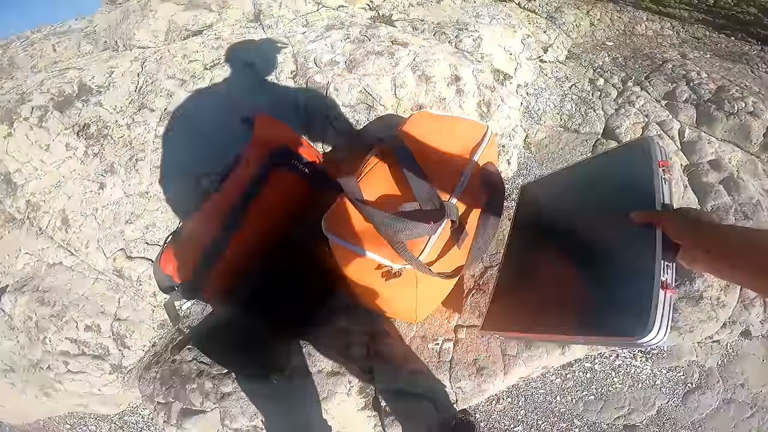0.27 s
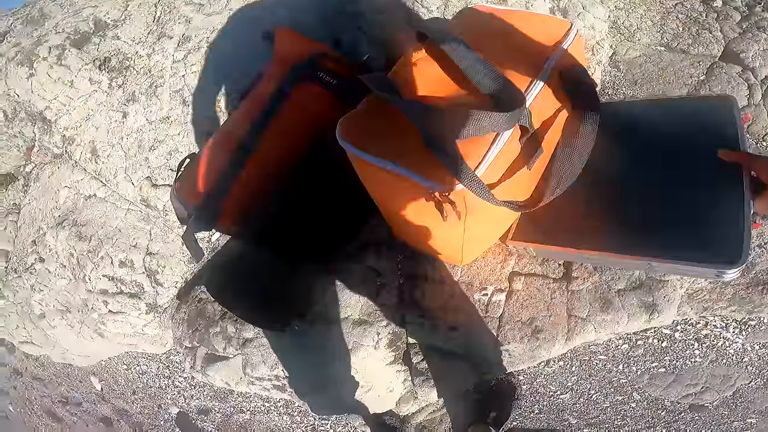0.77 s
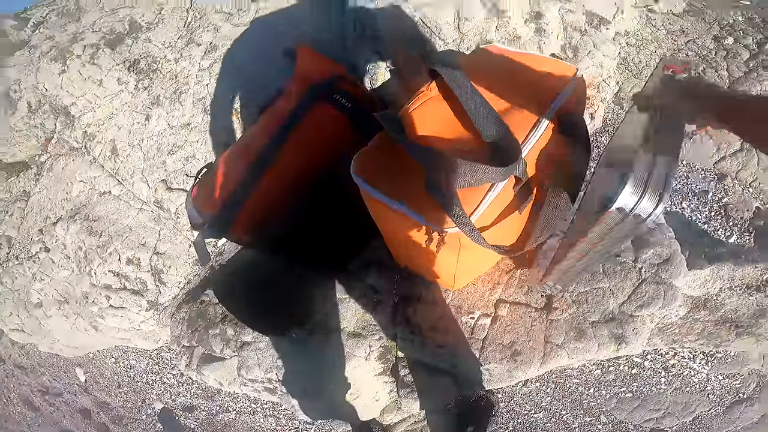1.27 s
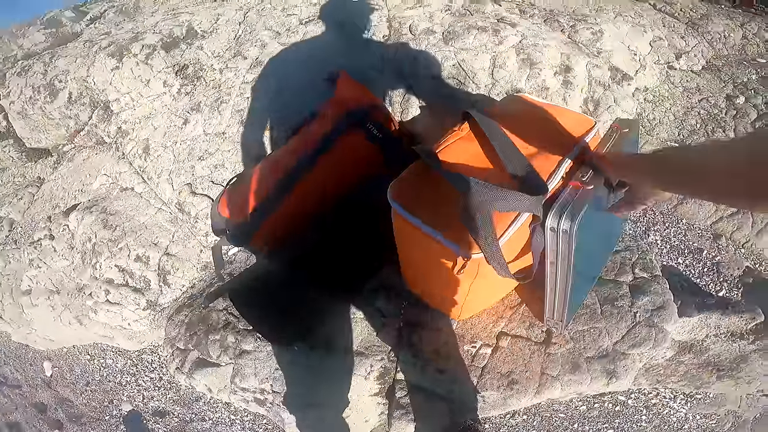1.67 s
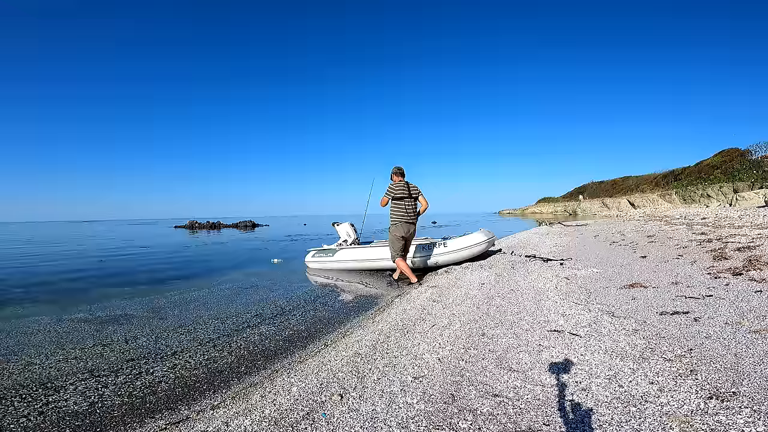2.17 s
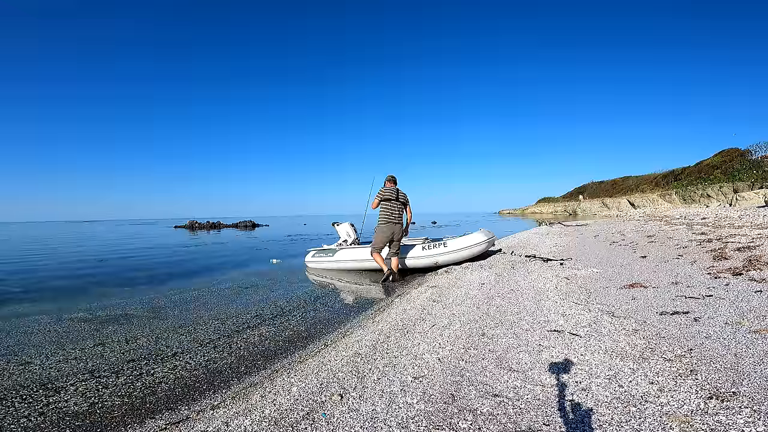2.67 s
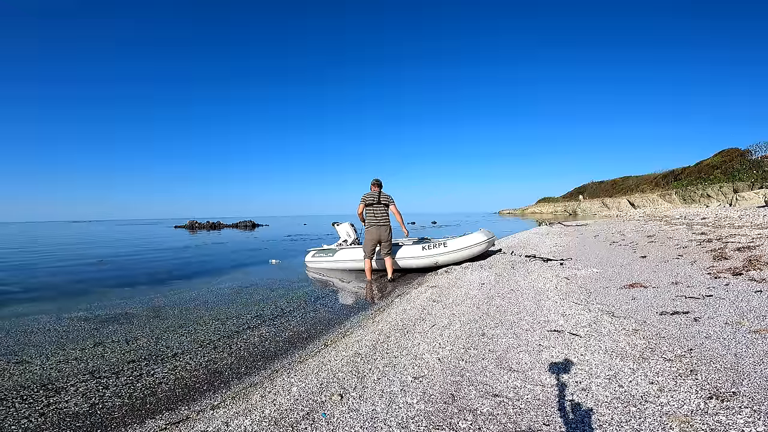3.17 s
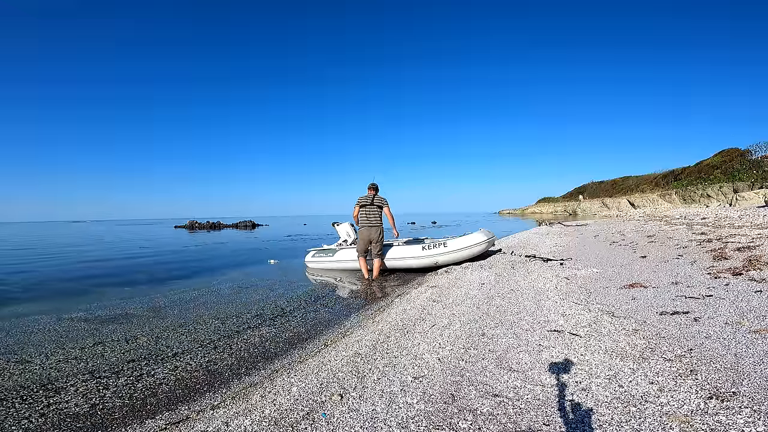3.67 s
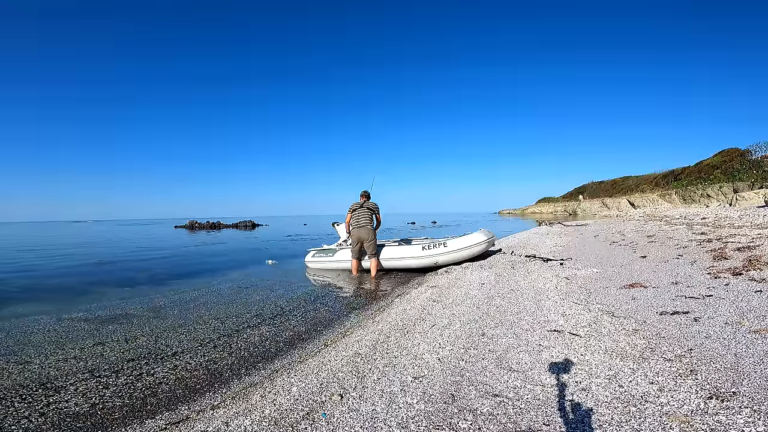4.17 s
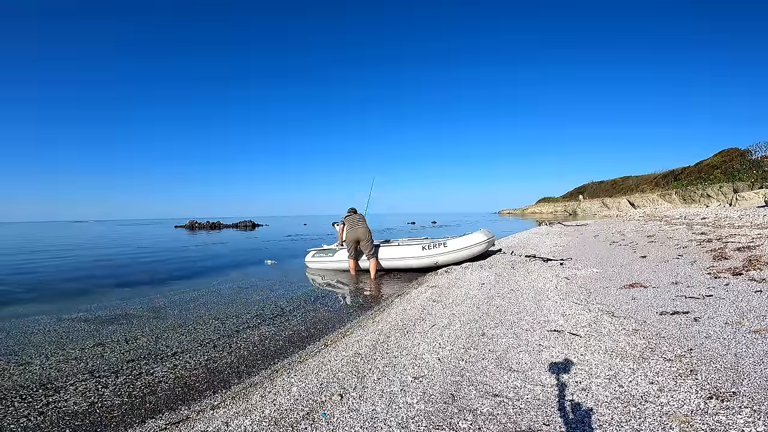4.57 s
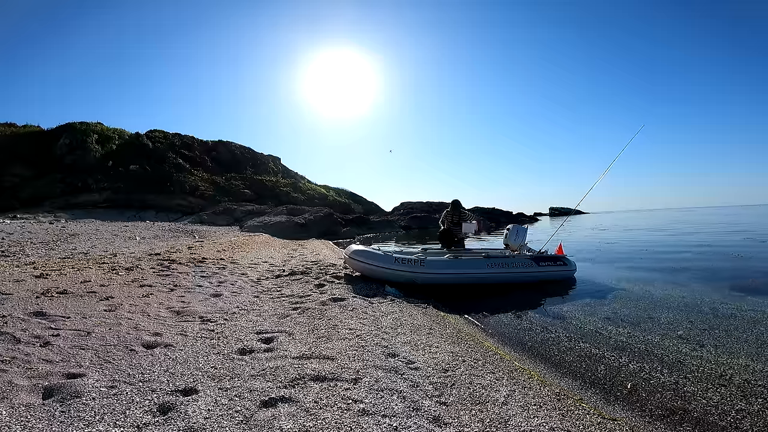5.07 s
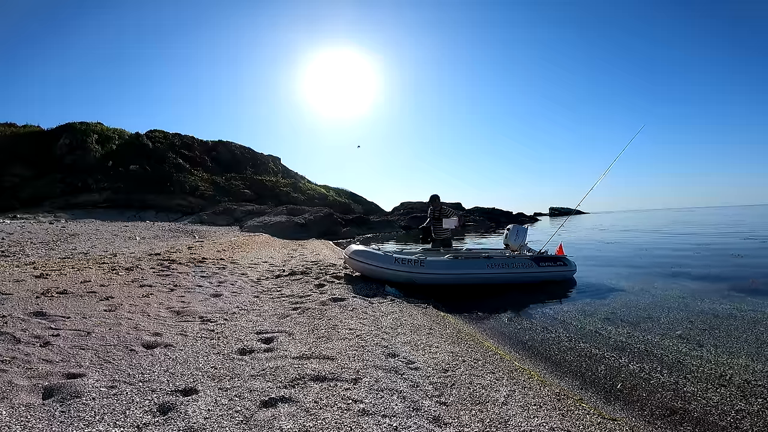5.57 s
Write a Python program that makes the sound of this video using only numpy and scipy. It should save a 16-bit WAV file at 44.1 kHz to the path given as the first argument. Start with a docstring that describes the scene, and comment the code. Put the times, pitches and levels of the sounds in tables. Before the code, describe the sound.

A folded metal table knocks and scrapes on rock beside nylon bags, then wading splashes in shallows, then quiet shore with a brief reel ratchet.

```python
"""Calm pebble beach: a folded table is knocked and dragged over rock and leant against nylon bags.
Frame and panel modes ring at each knock. Wading follows: shaped noise and crowds of rising bubble tones
make slosh, spray and fizz; swept tones make the gulps round the legs, noise ticks the wavelets on shingle.
Last, a fishing reel ratchets briefly as rows of pawl rings, with two faint knocks.
Low open-air rumble and a farther wash, both coloured noise, run throughout."""
import sys
import numpy as np
from scipy import signal
from scipy.fft import rfft, irfft, next_fast_len
from scipy.io import wavfile

SR = 44100
rng = np.random.default_rng(int(sys.argv[2]) if len(sys.argv) > 2 else 0)


def waveform_to_disk(signal):
    """Save audio, clipped to [-1, 1], as 16-bit WAV at the path in sys.argv[1]."""
    frames = np.transpose(np.atleast_2d(signal))
    scaled = np.clip(frames, -1, 1) * 32767
    samples = np.round(scaled).astype(np.int16)
    wavfile.write(sys.argv[1], SR, samples)


N = 257103
T = np.arange(N) / SR  # seconds

# Levels in the tables are relative, ahead of any trim in the function that reads them.
# Open-air rumble spectrum. Each row: frequency in Hz, level in dB.
RUMBLE_SPECTRUM = [(25, -38), (50, 2.5), (85, 1), (170, 1.5), (240, -1.5), (400, -14.5), (800, -21)]
# Farther water spectrum. Each row: frequency in Hz, level in dB.
FAR_WATER_SPECTRUM = [(200, -2), (450, -0.5), (800, -5), (1200, -4), (1600, -8), (2500, -8.5), (4000, -19),
                      (7000, -28.5), (8500, -41.5), (11000, -37), (14000, -52)]
# Farther waves lapping. Each row: peak in seconds, level in dB, rise in seconds, fall in seconds.
FAR_LAPS = [(4.42, -44.5, 0.23, 0.18), (5.16, -54.5, 0.31, 0.22), (5.8, -55.5, 0.93, 0.35)]
# Reel ratchet. One row: start in seconds, number of clicks, clicks a second.
REEL_TURN = (5.0635, 8, 75.5)
# Pawl modes. Each row: frequency in Hz, level in dB, t60 in seconds.
PAWL_MODES = [(1970, -6, 0.019), (2740, 0, 0.018), (3340, -8.5, 0.021), (3830, -9, 0.011),
              (4570, -15, 0.011), (5200, -23, .006)]
# Noise of the pawl's snap. Each row: frequency in Hz, level in dB.
SNAP_SPECTRUM = [(1500, -12.5), (3000, 14), (5500, -18)]
# Strides and shoves in the shallows. Each row: peak in seconds, spray in dB, slosh in dB,
# rise in seconds, settle in seconds.
STRIDES = [(2.52, -43.5, -52.5, 0.21, 0.27), (3.11, -41.5, -45.5, 0.092, 0.16),
           (3.47, -48.5, -56, 0.078, 0.14), (3.732, -34, -35, 0.12, 0.18), (3.98, -39, -47.5, 0.065, 0.075),
           (4.168, -38, -39.5, 0.17, 0.58), (4.45, -40, -67, .2, 0.13)]
# Wavelets running up the shingle. Each row: peak in seconds, level in dB, rise in seconds, fall in seconds.
WAVELETS = [(2.44, -44, 0.067, 0.045), (2.69, -42.5, 0.066, 0.09), (2.88, -41, 0.06, 0.1),
            (2.97, -39, 0.065, 0.096), (3.21, -42.5, 0.032, 0.043)]
# Water spectra: spray, slosh, fizz, wavelets on shingle. Each row: frequency in Hz, level in dB.
SPRAY_SPECTRUM = [(600, -34), (1200, -19), (1900, -1), (3000, 1), (4200, -5.5), (5500, -8), (8000, -53)]
SLOSH_SPECTRUM = [(200, 2), (300, -11), (600, -1.5), (1100, 5.5), (1600, 4), (2600, -25)]
FIZZ_SPECTRUM = [(2500, -2), (4500, -1), (5500, -1), (7200, -3), (8300, -21.5), (10500, -12), (12500, -31),
                 (14500, -49)]
SHINGLE_SPECTRUM = [(900, -17), (1600, -9), (2600, 1.5), (4000, 1), (5500, -4.5), (7200, -7), (8500, -21),
                    (11000, -20.5), (14000, -44)]
# Loudest bubbles. Each row: start in seconds, level in dB, starting pitch in Hz.
BUBBLES = [(2.482, -28, 4000), (2.571, -22.5, 1272), (2.663, -31, 5160), (2.668, -32.5, 1510),
           (2.825, -33, 1410), (2.858, -27.5, 2740), (2.997, -16.5, 3550), (3.057, -21, 2570),
           (3.129, -29, 1150), (3.135, -21.5, 3770), (3.157, -24, 2560), (3.193, -24.5, 3220),
           (3.252, -26.5, 3600), (3.284, -27.5, 2080), (3.344, -32.5, 3580), (3.36, -31.5, 1115),
           (3.484, -27.5, 3740), (3.599, -28.5, 960), (3.667, -25, 1340), (3.69, -19.5, 1680),
           (3.724, -14, 2780), (3.724, -15.5, 5120), (3.742, -16, 1810), (3.82, -23, 3800),
           (3.845, -25, 2640), (3.862, -29.5, 372), (3.98, -23, 2740), (4.105, -16.5, 1135),
           (4.165, -19, 2090), (4.289, -20.5, 1530), (4.32, -15.5, 1900), (4.393, -21.5, 2160),
           (4.478, -30.5, 292), (4.495, -25, 1460), (4.58, -27, 1880), (4.67, -30, 3290),
           (4.719, -41, 2930)]
# Slaps of water. Each row: start in seconds, level in dB, centre in Hz, t60 in seconds.
SLAPS = [(2.463, -28, 3500, 0.047), (2.993, -29, 2550, 0.15), (3.065, -27, 5400, 0.053),
         (3.42, -46, 7000, 0.011), (3.664, -20.5, 1480, 0.031), (3.721, -15, 3100, 0.019),
         (3.747, -22, 3120, 0.16), (4.158, -27, 800, .04), (4.276, -41, 370, 0.33),
         (4.279, -25.5, 2850, 0.088), (4.321, -17.5, 1960, 0.03), (4.362, -35, 342, 0.18),
         (4.472, -24, 1170, 0.038), (4.476, -42, 410, 0.082), (4.648, -32.5, 1450, 0.025)]
# Air pockets closing behind the legs. Each row: start in seconds, length in seconds,
# starting pitch in Hz, level in dB.
GULPS = [(2.585, 0.031, 1320, -46.5), (3.124, 0.036, 560, -44.5), (3.274, 0.077, 293, -54.5),
         (3.331, 0.057, 477, -48), (3.496, .027, 544, -51), (3.628, 0.027, 572, -44),
         (3.684, 0.042, 783, -32), (4.158, .028, 509, -32), (4.166, 0.053, 800, -33)]
# Strokes of nylon along the table. Each row: peak in seconds, level in dB, rise in seconds, fall in seconds.
STROKES = [(0.025, -41.5, 0.062, 0.11), (0.28, -47, 0.13, 0.15), (0.58, -47, 0.16, 0.16),
           (0.85, -35, 0.057, 0.037), (0.98, -49.5, .03, 0.087), (1.33, -49, 0.056, 0.15),
           (1.68, -42.5, 0.18, 0.11), (1.96, -50, 0.3, 0.24)]
# Table edge dragging on rock. Each row: time in seconds, level in dB.
DRAG_LEVEL = [(0.0, -46), (0.4, -49.5), (1.09, -42), (1.2, -50.5), (1.32, -52), (1.53, -51.5),
              (1.68, -43.5), (1.86, -47), (2.18, -55)]
# Nylon spectrum. Each row: frequency in Hz, level in dB.
NYLON_SPECTRUM = [(400, -7), (700, 6.5), (1300, -1.5), (2200, -2.5), (3600, -4), (5600, -5), (7300, -14.5),
                  (8500, -19.5), (11000, -18), (14000, -39.5)]
# Spectra of reedy cloth rub, panel boom and drag scuff. Each row: frequency in Hz, level in dB.
RUB_SPECTRUM = [(2300, -9.5), (2830, -1), (3250, -9), (3740, 0.0), (4600, -16)]
BOOM_SPECTRUM = [(80, -29), (200, -10.5), (300, 1.5), (600, -3.0)]
SCUFF_SPECTRUM = [(120, -21), (300, -9.5), (500, 8.0), (900, -3.5), (1800, -6.0)]
# Knocks of table and gear. Each row: start in seconds, clack in dB, panel thud in dB,
# treble tilt in dB an octave, clatter t60 in seconds, pitch of the struck spot in Hz.
KNOCKS = [(0.025, -23, -28, -6, 0.041, 3740), (0.128, -34, -28, -2.5, 0.028, 715),
          (0.239, -31, -31.5, -17, 0.041, 850), (0.437, -30, -42, -5.5, 0.011, 730),
          (0.483, -18.5, -28, -7, 0.014, 1680), (0.508, -13, -31.5, -1, 0.0089, 3180),
          (0.647, -14.5, -11, -1, 0.045, 1830), (0.872, -16, -29, -6, 0.014, 1300),
          (0.8895, -10, -13.5, -4.5, 0.023, 1790), (0.893, -23, -3, -7, 0.017, 593),
          (0.988, -19.5, -11.5, -4.5, 0.031, 880), (1.06, -36, -28, -1, 0.073, 2080),
          (1.102, -38, -22.5, -1.5, 0.25, 950), (1.126, -27.5, -16.5, -2, 0.12, 2040),
          (1.157, -22, -17.5, -3.5, 0.092, 760), (1.176, -19.5, -12.5, -3, 0.078, 905),
          (1.185, -21.5, -7, -4, 0.053, 1480), (1.254, -42, -66, 12, .0084, 5130),
          (1.318, -32, -56, 0, 0.029, 3580), (1.509, -4.5, -5, -2.5, 0.026, 3640),
          (1.605, -16.5, -18.5, -3.5, 0.076, 2240), (1.649, -11.5, -15, -2, 0.05, 1690),
          (1.676, -14, -33, -3.5, 0.018, 850), (1.698, -24.5, -36, -5, 0.074, 1240),
          (1.722, -13.5, -17.5, -1.5, 0.042, 2680), (1.751, -22, -27, -1, 0.022, 2940),
          (1.8093, -16.5, -44, -4.5, 0.0098, 2200), (1.85, -34, -46, -21, .029, 1210),
          (1.905, -25.5, -22, -1.5, 0.097, 1830), (1.978, -26.5, -34, -1.5, 0.037, 4520),
          (2.146, -26.5, -31, -1, 0.0055, 2060), (5.177, -35.5, -50, -6, 0.035, 1490),
          (5.421, -39, -65.5, -5, 0.012, 2320)]
# Hollow panel modes. Each row: frequency in Hz, level in dB, t60 in seconds.
PANEL_MODES = [(86.7, -31, 0.33), (135.8, -21.5, 0.33), (178, -39, 0.055), (200, -12.5, .12),
               (236.4, -16, 0.22), (267.1, 0, 0.12), (320, 6.5, 0.063), (364.4, 7, 0.049),
               (391.6, 6, 0.078), (428, -8.5, 0.13), (471, -6, 0.074), (540, -16.5, 0.034)]
# Aluminium frame resonances. Each row: frequency in Hz, width in Hz, level in dB.
FRAME_MODES = [(651, 55, 1), (790, 62, 1), (970, 23, -6), (1161, 35, -1), (1660, 27, -8), (1870, 56, 0),
               (2090, 63, 0.5), (2400, 21, -9.5), (2583, 19, 3.5), (3030, 39, -31), (3550, 66, -13),
               (4260, 77, -14), (4950, 190, -4.5), (5540, 200, -5.5), (6380, 390, -20.5), (7030, 450, -5)]
# Clack spectrum under the frame resonances. Each row: frequency in Hz, level in dB.
CLACK_SPECTRUM = [(150, -26), (450, 4), (900, 6.5), (2000, 5.5), (4000, 4.5), (6500, -2), (8000, -9),
                  (11000, -9), (14000, -47)]
# Rattle of panel on panel. Each row: frequency in Hz, level in dB.
RATTLE_SPECTRUM = [(70, -29), (130, -16), (220, -4), (400, -9), (560, -9.5), (1200, -12.5)]

EDGE_HZ = 14300
HANDLING_END_S, WADING_END_S = 2.18, 4.73
FAR_FLOOR_DB = -58
STRIDE_SHAPE, SWELL_SHAPE = 1.03, 1.84  # exponent of the fall in dB: 1 steady, 2 rounded
BUBBLE_T60_S, BUBBLE_SIZE_LAW = 0.041, 1  # t60 at 1 kHz; lower bubbles ring longer
GULP_OCTAVES_PER_S = 15.74


def amp(db):
    """Decibels to gain."""
    return 10 ** (np.asarray(db) / 20)


def unit(x):
    """Scales to an rms of one."""
    return x / np.sqrt(np.mean(x ** 2) + 1e-20)


def add(mix, start_s, sound):
    """Adds a sound to the mix at start_s."""
    part = mix[max(round(start_s * SR), 0):][:len(sound)]
    part += sound[:len(part)]


def read(points, hz):
    """Spectrum in dB at any frequency, falling 20 dB an octave beyond its ends."""
    point_hz, db = np.transpose(points)
    octave, known = np.log2(hz + 1), np.log2(point_hz + 1)
    beyond = abs(octave - np.clip(octave, known[0], known[-1]))
    return np.interp(octave, known, db) - 20 * beyond


def colour(x, points):
    """Filters a sound by a spectrum, at unit rms."""
    size = next_fast_len(len(x))
    gain = amp(read(points, np.fft.rfftfreq(size, 1 / SR)))
    return unit(irfft(rfft(x, size) * gain, size)[:len(x)])


def flutter(rate_hz, depth_db):
    """Gain that wanders at random."""
    knots = rng.standard_normal(N // 20)
    return amp(depth_db * np.interp(T * rate_hz, np.arange(len(knots)), knots))


def clicks(per_s, spread_db):
    """Random impulses, mostly small, a few large."""
    size = amp(spread_db * np.minimum(rng.exponential(1, N), 4)) * rng.choice([-1, 1], N)
    return size * (rng.random(N) < per_s / SR)


def swells(rows, shape):
    """Gain of overlapping swells: round rise, shaped fall, 10 dB down one rise or fall time off peak."""
    power = 0
    for peak_s, db, rise_s, fall_s in rows:
        before = np.maximum((peak_s - T) / rise_s, 0) ** 2
        after = np.maximum((T - peak_s) / fall_s, 0) ** shape
        power = power + amp(db - 10 * (before + after)) ** 2
    return np.sqrt(power)


def until(end_s):
    """Gate open until end_s, then shut over 10 ms."""
    return np.clip((end_s - T) * 100 + 1, 0, 1)


def crackle(per_s, points):
    """Tiny stones and drops tick: noise bursts, each dying within a few milliseconds."""
    t = np.arange(SR // 200) / SR
    ticks = np.zeros(N)
    for _ in range(8):  # eight tick shapes
        tick = rng.standard_normal(len(t)) * np.exp(-t / .0007)
        ticks += signal.oaconvolve(clicks(per_s / 8, 3), tick)[:N]
    return colour(ticks, points)


def ping(hz, t60_s, rise):
    """Bubble rings, pitch rising by the fraction rise over t60 as it nears the surface."""
    t = np.arange(int(t60_s * SR) + 8) / SR
    tone = np.sin(2 * np.pi * hz * (t + rise * t * t / (2 * t60_s)))
    return tone * 1000 ** (-t / t60_s) * (1 - np.exp(-t * hz * 2))


def froth(low_hz, high_hz, per_s, cycles, spread_db, rise, count=36):
    """Crowd of bubbles of many sizes, each size ringing for a number of its own cycles."""
    out = np.zeros(N)
    for hz in np.geomspace(low_hz, high_hz, count) * rng.uniform(.97, 1.03, count):
        bubble = ping(hz, cycles * rng.uniform(1.0, 2.6) / hz, rise)
        out += signal.oaconvolve(clicks(per_s / count, spread_db), bubble)[:N] * np.sqrt(hz)
    return unit(out)


def shore(rumble_db=-55):
    """Open air rumbles softly under the wash of farther wavelets."""
    air = colour(rng.standard_normal(N), RUMBLE_SPECTRUM) * flutter(26, 0.5)
    ticks = unit(clicks(400, 5.8))
    bubbles = froth(510, 3890, 240, 25, 6.4, 0.35, count=16)
    wash = colour(rng.standard_normal(N) + 0.28 * ticks + .15 * bubbles, FAR_WATER_SPECTRUM)
    return amp(rumble_db) * air + wash * np.hypot(amp(FAR_FLOOR_DB), swells(FAR_LAPS, SWELL_SHAPE))


def reel(click_db=-40, snap_t60_s=0.0049):
    """Pawl snaps over its teeth and rings, hardest in mid turn, dulled by distance."""
    start_s, teeth, per_s = REEL_TURN
    out, t = np.zeros(N), np.arange(SR // 20) / SR
    for k in range(round(teeth)):
        ring = np.zeros(len(t))
        for hz, db, t60_s in PAWL_MODES:
            ring += amp(db - 60 * t / t60_s) * np.sin(2 * np.pi * (hz * t + rng.random()))
        snap = amp(-60 * t / snap_t60_s) * colour(rng.standard_normal(len(t)), SNAP_SPECTRUM)
        force = np.sqrt(np.sin(np.pi * (k + .5) / teeth))
        add(out, start_s + k / per_s, amp(click_db) * force * (ring + snap))
    return signal.sosfilt(signal.butter(6, 5300, fs=SR, output="sos"), out)


def gulps(width_hz=130, churn=.55):
    """Shrinking air pocket rings upward, roughened by the churning water."""
    out = np.zeros(N)
    for start_s, length_s, start_hz, db in GULPS:
        size, pole = int(length_s * SR), np.exp(-np.pi * width_hz / SR)
        a, b = rng.standard_normal((2, size))
        wobble = signal.lfilter([1], [1, -2 * pole, pole * pole], a + 1j * b)  # slow, smooth churning
        pitch_hz = start_hz * 2 ** (GULP_OCTAVES_PER_S * T[:size])
        turn = np.exp(2j * np.pi * np.cumsum(pitch_hz) / SR)
        rough = (turn * (1 + churn * wobble / wobble.std())).real
        add(out, start_s, amp(db) * unit(rough * signal.windows.tukey(size, .5)))
    return out


def plops(slap_db=-2, rise=0.033):
    """Slaps of water burst briefly as noise; the loudest bubbles ring on their own."""
    out, t = np.zeros(N), np.arange(SR // 5) / SR
    for start_s, db, hz in BUBBLES:
        t60_s = BUBBLE_T60_S * (1000 / hz) ** BUBBLE_SIZE_LAW
        add(out, start_s, amp(db) * ping(hz, t60_s, rise))
    for start_s, db, hz, t60_s in SLAPS:
        band = [(hz / 3, -20), (hz * 0.69, -3), (hz, 0), (hz * 1.64, -6), (hz * 2.3, -24)]
        burst = colour(rng.standard_normal(len(t)), band) * (1 - np.exp(-t / 0.00007))
        add(out, start_s, amp(db + slap_db - 60 * t / t60_s) * burst)
    return signal.sosfilt(signal.butter(2, 7800, fs=SR, output="sos"), out)


def shallows(fizz_db=-14, plink_db=-2, drop_db=-3):
    """Strides stir water: large bubbles slosh, small ones spray and plink; wavelets tick through shingle."""
    spray = swells([(s, db, rise, settle) for s, db, _, rise, settle in STRIDES], STRIDE_SHAPE)
    slosh = swells([(s, db, rise, settle) for s, _, db, rise, settle in STRIDES], STRIDE_SHAPE)
    hiss = amp(-6) * rng.standard_normal((4, N))
    small = colour(froth(1200, 6500, 1500, 30, 3.5, .22) + .7 * hiss[0], SPRAY_SPECTRUM)
    small += amp(drop_db) * crackle(160, SPRAY_SPECTRUM)
    plinks = amp(plink_db) * froth(1280, 4570, 120, 48, 4.3, 0.13, count=28)
    large = colour(froth(280, 1900, 300, 26, 2.5, .4), SLOSH_SPECTRUM)
    large += amp(-8) * colour(hiss[1], SLOSH_SPECTRUM)
    foam = colour(hiss[2] + 1.1 * unit(clicks(2000, 3.8)), FIZZ_SPECTRUM)
    wash = colour(hiss[3] + froth(1500, 6000, 700, 32, 3, .1, count=20), SHINGLE_SPECTRUM)
    wash = unit(wash + .7 * crackle(240, SHINGLE_SPECTRUM))
    surge = flutter(70, 1.8)
    stirred = (unit(small * surge + plinks) + amp(fizz_db) * unit(foam * surge)) * spray
    stirred += unit(large) * slosh
    # reversed surge keeps the wavelets out of step with the spray
    lapping = unit(wash * surge[::-1]) * swells(WAVELETS, SWELL_SHAPE)
    return (stirred + lapping) * until(WADING_END_S)


def panel_ring(vary_db=2, swell_s=0.0036, low_hz=70):
    """Panels' low ring: each blow stirs the modes a little differently; deep bass does not radiate."""
    t = np.arange(SR // 2) / SR
    ring = np.zeros(len(t))
    for hz, db, t60_s in PANEL_MODES:
        level, detune = rng.standard_normal(2)
        tone = np.sin(2 * np.pi * hz * (1 + 0.0091 * detune) * t + 0.37 * detune)
        ring += amp(db + vary_db * level - 60 * t / t60_s) * tone
    ring *= 1 - np.exp(-t / swell_s)
    ring = signal.sosfilt(signal.butter(3, low_hz, "high", fs=SR, output="sos"), ring)
    return ring / abs(ring).max()


def clack(tilt_db, t60_s, spot_hz, lead_s, ring_db=4, spot_db=6, spot_q=6,
          tail_db=-31, tail_t60_s=0.38, scrape_db=-11, scrape_s=0.0035):
    """Metal scrapes into contact, chatters on stone and rings the frame; rocks scatter a faint tail."""
    size = 16384
    t, hz = np.arange(size) / SR - lead_s, np.fft.rfftfreq(size, 1 / SR)
    scrape = amp(scrape_db) * np.exp(-abs(t) / scrape_s)
    chatter = amp(-60 * abs(t) / t60_s) + amp(tail_db - 60 * abs(t) / tail_t60_s)
    force = np.where(t < 0, scrape, chatter)
    frame = sum(amp(db + ring_db) / (1 + 2j * (hz - f) / width) for f, width, db in FRAME_MODES)
    frame = frame / (1 + (hz / 8000) ** 8)
    # broad resonance of the struck spot
    spot = 1 + amp(spot_db) / (1 + 2j * spot_q * (hz / spot_hz - 1))
    tilt = amp(tilt_db * np.log2(np.clip(hz, 700, 9000) / 2000))
    body = (amp(read(CLACK_SPECTRUM, hz)) + frame) * spot * tilt
    body /= np.sqrt(np.mean(abs(body) ** 2))
    return irfft(rfft(force * rng.standard_normal(size)) * body)[:size * 3 // 4]


def handling(scuff_db=-2, rub_db=-7, tap_db=-9, taps_per_s=45):
    """Nylon and grit slide along the table, rustle, tap the frame lightly and keep its panels astir."""
    # grit ticks in the hiss of the weave; taut cloth has two reedy resonances
    fibres = colour(rng.standard_normal(N), NYLON_SPECTRUM) + .7 * crackle(260, NYLON_SPECTRUM)
    rub = colour(rng.standard_normal(N), RUB_SPECTRUM)
    cloth = unit((fibres + amp(rub_db) * rub) * flutter(90, 1.5))
    boom = colour(signal.oaconvolve(clicks(830, 2.2), panel_ring())[:N], BOOM_SPECTRUM)
    scuff = colour(rng.standard_normal(N) * flutter(50.04, 5.5), SCUFF_SPECTRUM)
    taps = unit(signal.oaconvolve(clicks(taps_per_s, 1.3), clack(-3.5, 0.012, 3000, 0))[:N])
    drag = boom + amp(scuff_db) * scuff + amp(tap_db) * taps
    drag *= amp(np.interp(T, *np.transpose(DRAG_LEVEL)))
    return (cloth * swells(STROKES, SWELL_SHAPE) + drag) * until(HANDLING_END_S)


def table(clack_db=-2.5, lag_s=0.001, rattle_db=-16, rattle_t60_s=0.077):
    """Each knock clacks the frame, then thuds the panels, which rattle against each other."""
    out, t = np.zeros(N), np.arange(SR // 4) / SR
    lead_s = .015  # scrape ahead of contact
    for start_s, hit_db, body_db, tilt_db, t60_s, spot_hz in KNOCKS:
        rattle = colour(rng.standard_normal(len(t)), RATTLE_SPECTRUM)
        rattle *= amp(rattle_db - 60 * t / rattle_t60_s) * (1 - np.exp(-t / 0.0039))
        add(out, start_s - lead_s, amp(hit_db + clack_db) * clack(tilt_db, t60_s, spot_hz, lead_s))
        add(out, start_s + lag_s, amp(body_db) * panel_ring())
        add(out, start_s + lag_s, amp(body_db) * rattle)
    return out


def scene():
    """All sources at one microphone."""
    return (shore() + reel() + gulps() + plops() + shallows() + handling() + table())[None]


def record(dry, notch_hz=9200, notch_q=5):
    """Microphone port notches the treble; the hardest knocks are rounded off; then the band limit."""
    ported = signal.lfilter(*signal.iirnotch(notch_hz, notch_q, SR), dry)
    rounded = ported / (1 + (ported / .92) ** 8) ** (1 / 8)
    band = signal.firwin(255, EDGE_HZ, window=("kaiser", 9), fs=SR)
    return signal.oaconvolve(rounded, band[None], "same")


dry = scene()
out = record(dry)
waveform_to_disk(out)
```